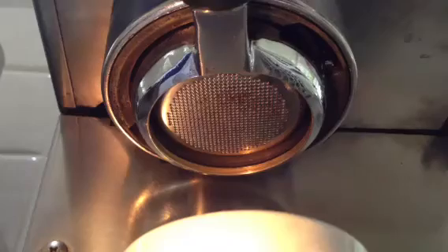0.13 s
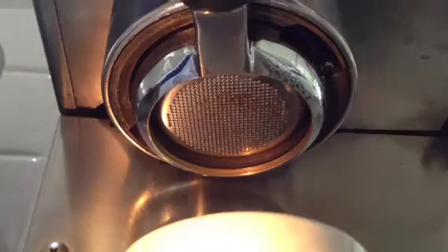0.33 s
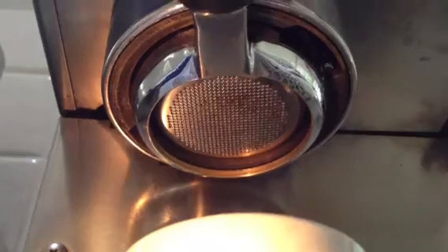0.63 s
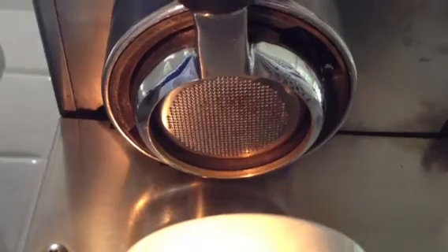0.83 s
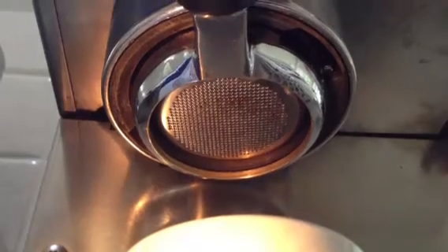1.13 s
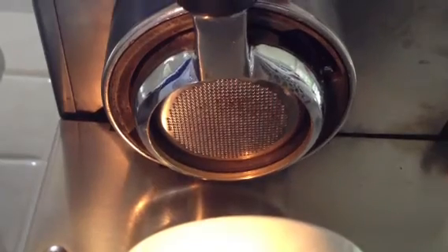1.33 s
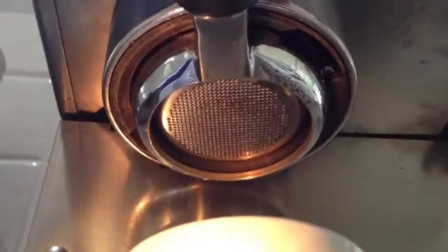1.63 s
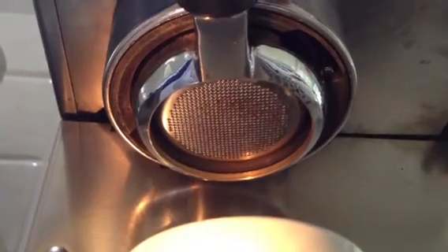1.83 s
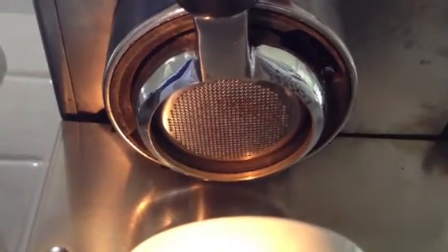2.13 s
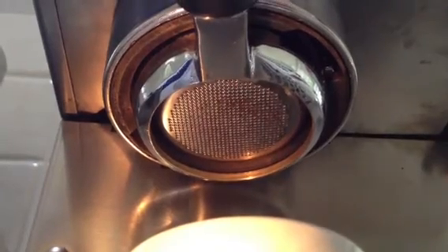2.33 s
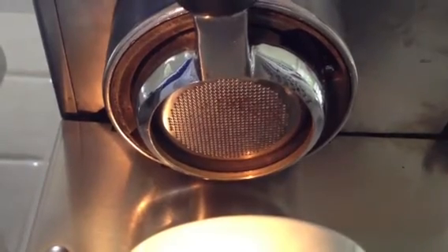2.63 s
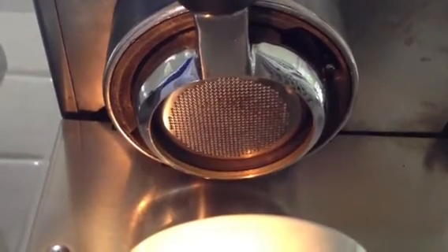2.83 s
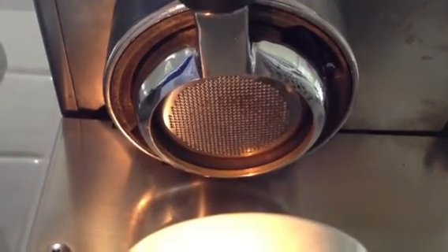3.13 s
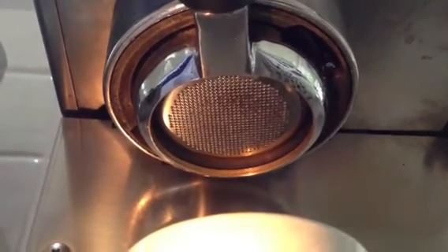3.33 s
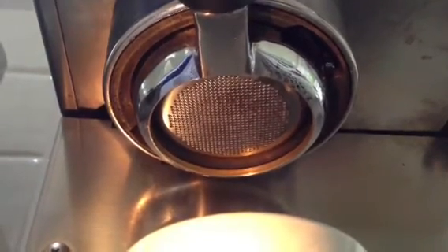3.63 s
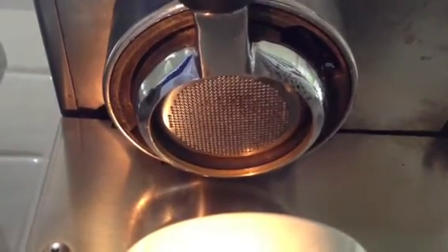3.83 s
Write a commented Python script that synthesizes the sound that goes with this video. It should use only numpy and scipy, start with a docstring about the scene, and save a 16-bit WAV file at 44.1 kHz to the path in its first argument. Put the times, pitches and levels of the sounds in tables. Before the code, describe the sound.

In a quiet kitchen, soft handling noises lead to a sharp switch click, and an espresso machine pump starts up. Heard close, it keeps buzzing with a metallic rattle, hissing water and a slight whine that climbs unevenly.

```python
"""A faint fumble in a quiet kitchen, then a switch snaps and an espresso pump buzzes to life, close up.
Its piston shuttles once per mains cycle, giving a hum of unsteady overtones and knocks that rattle
the steel case. Water hisses in bursts timed to the strokes, and a resonance climbs as pressure builds.
Soft microphone hiss and a low room murmur lie underneath."""
import sys
import numpy as np
from scipy import signal
from scipy.fft import rfft, irfft, next_fast_len
from scipy.io import wavfile
from scipy.ndimage import map_coordinates

SR = 44100
rng = np.random.default_rng(int(sys.argv[2]) if len(sys.argv) > 2 else 0)


def bounce(signal):
    """Save signal as a 16-bit WAV file at the path given by the first command-line argument."""
    frames = np.transpose(np.atleast_2d(signal))
    limited = np.clip(frames, -1, 1)
    pcm = np.round(limited * 32767).astype(np.int16)
    wavfile.write(sys.argv[1], SR, pcm)


N = 176400
T = np.arange(N) / SR

MAINS_HZ, CYCLE_START_S = 50.04, 1.75
PUMP_ON_S, SPIN_UP_S = 1.722, 0.019
STROKE_MS, STROKE_SPREAD_CYCLES = 1.5, .17  # where in the cycle the overtones gather, and how loosely
WANDER_DEPTH, WANDER_PER_S = 0.32, 22
KNOCK_SCATTER_MS, KNOCK_DRIFT_MS, KNOCK_SCATTER_DB = .12, .4, 3
STEADY_HISS_DB, SPURT_SCATTER_DB = -3, 2.5
STRAIN_WIDTH_HZ = 35
ROOM_DB, ROOM_T60_S = -16, 0.43

# Fader for the hum below 400 Hz: time_s, level_db
LOW_HUM_FADER = [(1.76, -42.5), (2.3, -35.5), (2.8, -38), (3.3, -35.5)]
# Balance of harmonics 3 to 7: gain_db
LOW_HARMONICS = [-11.5, 0, -3, -5, -3]
# Faders for harmonics 8 to 10, near 400-500 Hz: time_s, eighth_db, ninth_db, tenth_db
MID_HUM_FADERS = [(1.85, -43, -39.5, -46.5), (1.95, -32.5, -39.5, -38.5), (2.15, -46, -36.5, -44),
                  (2.4, -38.5, -41, -47), (2.53, -40.5, -36.5, -48), (2.62, -40, -57, -33),
                  (2.75, -33, -44, -38.5), (2.95, -38, -42, -35), (3.1, -30, -47.5, -50),
                  (3.22, -36.5, -29.5, -54), (3.45, -46.5, -35, -46), (3.65, -37, -35, -52),
                  (3.94, -39.5, -34, -51)]
# Balance of harmonics 11 to 28: gain_db
HIGH_HARMONICS = [-2.5, -38, -7, -3.5, -4.5, -21, -6, -8, -18, -6.5, -9, -5, -6.5, -6, -18, -10.5, -11,
                  -4.5]
# Resonance that climbs as pressure builds: time_s, pitch_hz, level_db
STRAIN_PATH = [(2.5, 750, -76), (2.62, 735, -41.5), (2.72, 680, -33.5), (2.8, 700, -48), (2.92, 708, -37),
               (2.97, 750, -42.5), (3.02, 778, -38), (3.15, 787, -45.5), (3.25, 797, -50),
               (3.4, 784.4, -41), (3.5, 888, -53), (3.95, 873, -47.5)]
# Faders for rattle and hiss: time_s, knock_db, lower_panel_db, upper_panel_db, mid_hiss_db, high_hiss_db
PUMP_FADERS = [(1.8, -45.5, -68, -50, -54, -50.5), (1.98, -43.5, -44.5, -45, -45.5, -46.5),
               (2.04, -41, -53, -49, -50, -47.5), (2.08, -42, -46.5, -42, -43, -45),
               (2.33, -43, -38, -46, -45.5, -41), (2.41, -38.5, -36, -42, -45, -38.5),
               (2.47, -42.5, -40.5, -44.5, -50, -40.5), (2.6, -42.5, -38, -40.5, -48, -41),
               (2.68, -41, -43.5, -45.5, -47, -43.5), (3.1, -41.5, -45.5, -48, -48, -42),
               (3.38, -43, -69, -43.5, -48, -41.5), (3.95, -41, -51.5, -46, -47, -43)]
# Piston and valve hits within a cycle: offset_ms, gain_db
CYCLE_KNOCKS = [(9.5, -7), (14, -5), (16.5, -9.5), (19.2, -3.5)]
# Modes of the case and two panels: pitch_hz, width_hz, gain_db
CASE_MODES = [(511, 77, 4.5), (966, 215, -8), (1193, 127, -3.5), (1338, 138, -1)]
LOWER_PANEL_MODES = [(1750, 114, -2), (1900, 150, -1)]
UPPER_PANEL_MODES = [(2169, 120, 0)]
# Slow first strokes: start_s
THUD_STARTS = [1.748, 1.774, 1.802, 1.824, 1.850, 1.874]
# Their dull ring: pitch_hz, width_hz, gain_db
THUD_MODES = [(470, 37, 17.8)]
# Water spurts within a cycle: offset_ms, fall_ms, gain_db
CYCLE_SPURTS = [(4.6, 2.3, -1.5), (12.4, 2.5, -1), (16, 5.1, -2)]
# Spurt strength as the water load changes: time_s, first_spurt_db, later_spurts_db
WATER_LOAD = [(2.05, 1, 3), (2.075, 6, -5.5), (2.62, 5.5, 1), (2.7, 2, -2), (3.72, -2.5, 2), (3.74, 2, 5),
              (3.8, -4, 2.5), (3.94, -16, -1), (3.965, -5, 5.5)]
# Body of the water hiss: centre_hz, width_hz, gain_db
MID_HISS_BAND = [(4100, 6100, 0)]
# Sizzle of the water hiss: frequency_hz, gain_db
HIGH_HISS_EQ = [(3000, -3.5), (5300, -21), (5800, -8.5), (7200, -4.5), (9100, -7.5), (11000, -13.5),
                (15400, -16.5)]
# Bright modes of the steel: pitch_hz, width_hz, gain_db
MID_STEEL_MODES = [(3640, 70, -1), (3880, 160, -1), (4327, 160, 1), (4644, 160, 0), (5109, 200, -4)]
HIGH_STEEL_MODES = [(5840, 400, 1.5), (6270, 90, 4), (6660, 260, 4), (6823, 140, 0), (7280, 226, 3)]
# Shaking noise between the overtones: frequency_hz, gain_db
BUZZ_EQ = [(30, -16), (110, -25), (190, -4), (450, -17), (1350, -18.5), (1600, -16), (2600, -23.5),
           (3400, -70)]
# Ticks and snap of the switch: start_s, level_db, t60_s
SWITCH_HITS = [(1.6935, -45.5, 0.071), (1.705, -36, 0.11), (1.711, -25.5, 0.19), (1.7166, -4.5, 0.041),
               (1.7195, -9.5, 0.042)]
# Colour of each crack: frequency_hz, gain_db
SNAP_EQ = [(150, -54.5), (460, -1), (800, -11), (2300, -5.5), (3800, -1.5), (6000, -5.5), (10700, -4),
           (15400, -15.5)]
# Ring of the switch housing: pitch_hz, gain_db, t60_s
HOUSING_MODES = [(537, -4, 0.16), (3730, -1.5, 0.036), (4030, -8, 0.07), (4510, -14, 0.036),
                 (5650, -14, 0.11), (7370, 4.5, 0.017)]
# Handling sounds, and one thin spit of water: start_s, level_db, centre_hz, width_hz, rise_s, t60_s
HAND_FUMBLES = [(.184, -52.5, 277, 247.2, 0.0016, 0.17), (.192, -60, 4231, 300, 0.00629, 0.31),
                (0.549, -58.5, 3887, 900, 0.02798, 0.3), (0.577, -54.5, 480, 298, 0.018, 0.2),
                (.7655, -53, 980, 800, 0.00033, 0.05), (1.213, -60, 179, 101, .005, 0.3),
                (1.292, -58, 390, 160, 0.003, 0.12), (1.428, -57, 1950, 1500, .008, 0.15),
                (1.468, -58, 396, 200, 0.0097, 0.17)]
WATER_SPIT = (2.165, -47, 14200, 1200, .015, .2)
# Microphone hiss: frequency_hz, gain_db
FLOOR_EQ = [(40, -10), (180, -1), (420, -11), (1000, -12), (1700, -15), (3500, -14), (15400, -18.5)]


def pump():
    """The piston hums, shakes the steel and drives the water, all fading up quickly at switch-on."""
    knock_db, lower_db, upper_db, mid_db, high_db = curves(PUMP_FADERS)
    hits = knocks()
    steel = rattle(hits, knock_db, lower_db, upper_db)
    water = water_hiss(hits, mid_db, high_db)
    spin_up = np.clip((T - PUMP_ON_S) / SPIN_UP_S, 0, 1)
    return spin_up * (hum(knock_db) + strain() + first_strokes() + steel + water)


def overtone(k, wander):
    """A tone at k times the stroke rate, wavering in level and phase."""
    swell = 1 + wander / 2 * wobble(WANDER_PER_S)
    sway = wander * wobble(WANDER_PER_S)
    turns = k * MAINS_HZ * (T - CYCLE_START_S - STROKE_MS / 1000)
    turns += STROKE_SPREAD_CYCLES * rng.standard_normal()
    return swell * np.cos(2 * np.pi * turns + sway)


def hum(knock_db):
    """Harmonics of the stroke, shakier the higher they lie; the top ones ride the knock fader."""
    def harmonic(k):
        main = overtone(k, WANDER_DEPTH * (k / 8) ** 0.9)
        return main + amp(-13.5) * overtone(k + .5, 0.64)  # alternating strokes add a tone halfway up

    def stack(gains_db, first):
        return unit(sum(amp(db) * harmonic(k) for k, db in enumerate(gains_db, first)))

    low = amp(curves(LOW_HUM_FADER)[0]) * stack(LOW_HARMONICS, first=3)
    high = amp(knock_db + 1) * stack(HIGH_HARMONICS, first=11)
    mid = sum(amp(db) * unit(harmonic(k)) for k, db in enumerate(curves(MID_HUM_FADERS), 8))
    return low + mid + high


def strain():
    """A resonance climbs unevenly as pressure builds, picking out the overtones it passes."""
    pitch_hz, level_db = curves(STRAIN_PATH)
    nearness = lambda k: np.exp(-((k * MAINS_HZ - pitch_hz) / STRAIN_WIDTH_HZ) ** 2)
    whine = sum(overtone(k, wander=0.65) * nearness(k) for k in range(12, 21))
    return amp(level_db) * np.sqrt(2) * whine


def knocks():
    """Impulses of the piston and its valve, at set moments of every cycle but a little uneven."""
    offset_ms, gain_db = np.transpose(CYCLE_KNOCKS)
    cycles_s = np.arange(int(N / SR * MAINS_HZ) - 2) / MAINS_HZ + CYCLE_START_S % (1 / MAINS_HZ)
    drift = np.array([wobble(4)[(cycles_s * SR).astype(int)] for _ in offset_ms]).T
    slip_ms = KNOCK_DRIFT_MS * drift + KNOCK_SCATTER_MS * rng.standard_normal(drift.shape)
    hit_s = cycles_s[:, None] + (offset_ms + slip_ms) / 1000
    force = amp(gain_db + KNOCK_SCATTER_DB * rng.standard_normal(drift.shape))
    return np.bincount(np.abs(hit_s * SR).astype(int).ravel(), force.ravel(), N)[:N]


def rattle(hits, knock_db, lower_db, upper_db):
    """Knocks and loose chatter ring the case and its panels over a steady shaking noise."""
    chatter = hits + .6 * hits.std() * rng.standard_normal(N)
    case = amp(knock_db + 1.5) * unit(resonant(chatter, CASE_MODES))
    panels = sum(amp(db - 1) * unit(resonant(resonant(chatter, modes), modes))
                 for db, modes in [(lower_db, LOWER_PANEL_MODES), (upper_db, UPPER_PANEL_MODES)])
    buzz = amp(knock_db.mean()) * unit(coloured(rng.standard_normal(N), BUZZ_EQ))
    return case + panels + buzz


def first_strokes():
    """The first strokes land slowly and apart, each a dull ring of the case."""
    strokes = np.bincount((np.array(THUD_STARTS) * SR).astype(int), minlength=N)
    return resonant(strokes, THUD_MODES)


def spurts():
    """Water noise surges three times a cycle over a steady flow: quick rise, slower fall."""
    cycle_ms = 1000 / MAINS_HZ
    clock_ms = (T - CYCLE_START_S) * 1000 + 0.23 * wobble(28.8)
    first_db, later_db = curves(WATER_LOAD)
    flow = amp(STEADY_HISS_DB)
    for (offset_ms, fall_ms, db), load_db in zip(CYCLE_SPURTS, [first_db, later_db, later_db]):
        from_peak_ms = (clock_ms - offset_ms + cycle_ms / 2) % cycle_ms - cycle_ms / 2
        width_ms = np.where(from_peak_ms < 0, .35 * fall_ms, fall_ms)
        surge = np.exp(-(from_peak_ms / width_ms) ** 2)
        flow = flow + amp(db + load_db + SPURT_SCATTER_DB * wobble(29.87)) * surge
    return flow * rng.standard_normal(N)


def water_hiss(hits, mid_db, high_db):
    """Two bands of pulsing hiss, each with the ring of steel excited by knocks and spurts."""
    def ring(modes):
        return unit(resonant(unit(hits) / 2 + unit(spurts()), modes))

    body = unit(resonant(resonant(spurts(), MID_HISS_BAND), MID_HISS_BAND))
    sizzle = unit(coloured(spurts(), HIGH_HISS_EQ))
    mid = amp(mid_db) * (amp(-2) * body + ring(MID_STEEL_MODES))
    high = amp(high_db) * (amp(-2.5) * sizzle + ring(HIGH_STEEL_MODES))
    return mid + high


def switch():
    """Small ticks lead into a sharp snap that rings the housing and the kitchen."""
    out, t = np.zeros(N), T[:SR // 2]
    attack = 1 - np.exp(-t / .0002)
    for start_s, level_db, t60_s in SWITCH_HITS:
        crack = unit(coloured(rng.standard_normal(len(t)), SNAP_EQ)) * amp(-60 * t / t60_s) / 2
        ring = sum(amp(db + 2 * rng.standard_normal() - 60 * t / ring_s) * np.sin(2 * np.pi * hz * t)
                   for hz, db, ring_s in HOUSING_MODES)
        out[round(start_s * SR):][:len(t)] += amp(level_db) * attack * (crack + amp(-13.5) * ring)
    bright_noise = resonant(rng.standard_normal(len(t)), [(3780, 1400, 3.0), (10709, 6700, -2.5)])
    tail = bright_noise * amp(-60 * t / ROOM_T60_S)
    return out + amp(ROOM_DB) * signal.fftconvolve(out, tail / np.linalg.norm(tail))[:N]


def fumbles_and_spit():
    """A hand bumps and rustles, and water spits once: each a faint, dying puff of narrow noise."""
    out, t = np.zeros(N), T[:SR // 2]
    for start_s, level_db, centre_hz, width_hz, rise_s, t60_s in [*HAND_FUMBLES, WATER_SPIT]:
        band = resonant(rng.standard_normal(len(t)), [(centre_hz, width_hz, 0)])
        puff = unit(resonant(band, [(centre_hz, 2 * width_hz, 0)]))
        envelope = amp(level_db - 60 * t / t60_s) * (1 - np.exp(-t / rise_s))
        out[round(start_s * SR):][:len(t)] += envelope * puff
    return out


def room_tone():
    """Steady microphone hiss and an uneven low murmur of the room."""
    hiss = amp(-66) * unit(coloured(rng.standard_normal(N), FLOOR_EQ))
    murmur_db = -76 + 2.2 * wobble(12)
    murmur = resonant(rng.standard_normal(N), [(167, 16, -0.5), (422, 26, -0.5)])
    return hiss + amp(murmur_db) * unit(resonant(murmur, [(274.2, 1174, 0)]))


def amp(db):
    """Decibels to linear gain."""
    return 10 ** (np.asarray(db) / 20)


def unit(x):
    """x at an RMS of one."""
    return x / np.sqrt(np.mean(x ** 2) + 1e-20)


def curves(rows):
    """A per-sample automation curve for each column after time_s."""
    time_s, *columns = np.transpose(rows)
    return [np.interp(T, time_s, column) for column in columns]


def wobble(knots_per_s):
    """A smooth random drift."""
    coarse_s = T[::32]
    drift = map_coordinates(rng.standard_normal(400), [coarse_s * knots_per_s])
    return np.interp(T, coarse_s, drift)


def filtered(x, response):
    """x through a complex frequency response."""
    size = next_fast_len(len(x) + 8192)
    return irfft(rfft(x, size) * response(np.fft.rfftfreq(size, 1 / SR)), size)[:len(x)]


def coloured(x, eq):
    """x through an EQ curve: frequency_hz, gain_db."""
    points_hz, gain_db = np.transpose(eq)
    return filtered(x, lambda hz: amp(np.interp(np.log(hz + 1), np.log(points_hz + 1), gain_db)))


def resonant(x, modes):
    """x through parallel resonators of alternating polarity: pitch_hz, width_hz, gain_db."""
    def response(hz):
        return sum((-1) ** k * amp(db) * 1j * hz * width / (pitch ** 2 - hz ** 2 + 1j * hz * width)
                   for k, (pitch, width, db) in enumerate(modes))
    return filtered(x, response)


def scene():
    """Pump and switch over the quiet kitchen, in mono."""
    return (pump() + switch() + room_tone() + fumbles_and_spit())[None]


def record(dry):
    """The microphone opens after a beat of silence, thins the deep bass and cuts the very top."""
    open_s, bass_hz, top_hz = 0.084, 125, 15300
    x = filtered(dry[0], lambda hz: (hz < top_hz) * (0.023 + hz ** 4 / (hz ** 4 + bass_hz ** 4)))
    return (x * np.clip((T - open_s) / .002, 0, 1))[None]


dry = scene()
out = record(dry)
bounce(out)
```